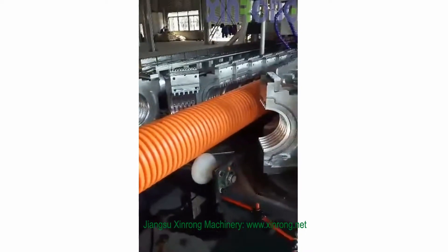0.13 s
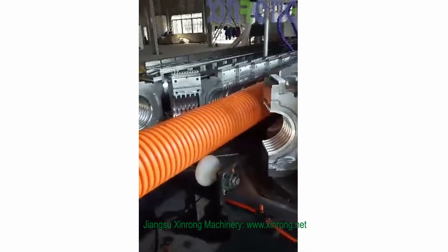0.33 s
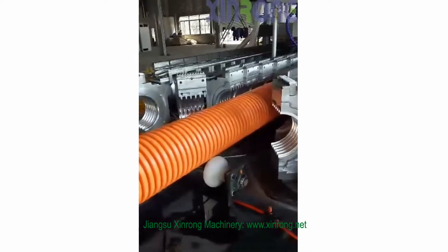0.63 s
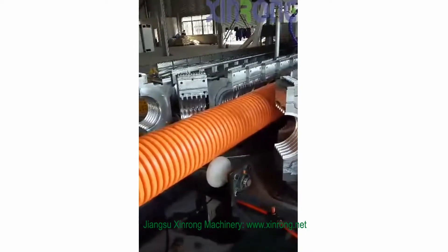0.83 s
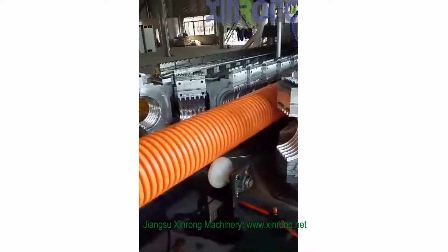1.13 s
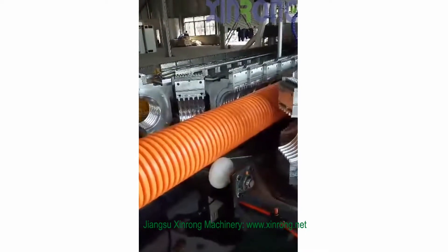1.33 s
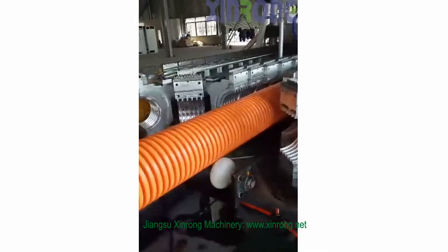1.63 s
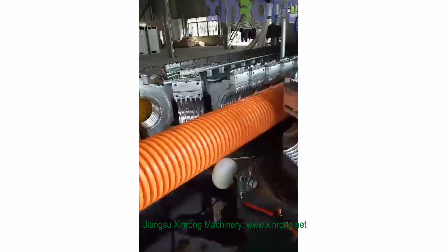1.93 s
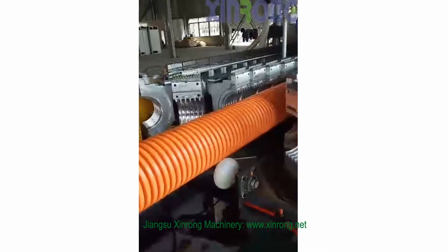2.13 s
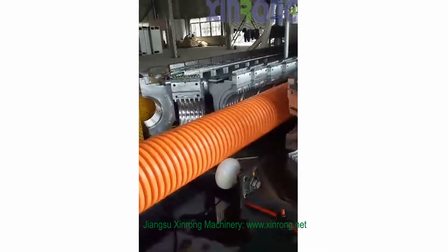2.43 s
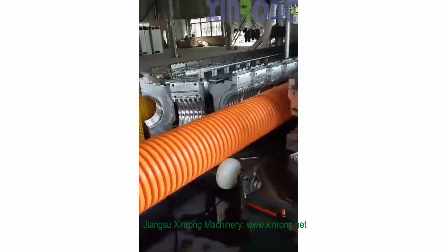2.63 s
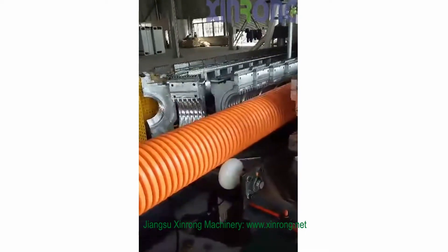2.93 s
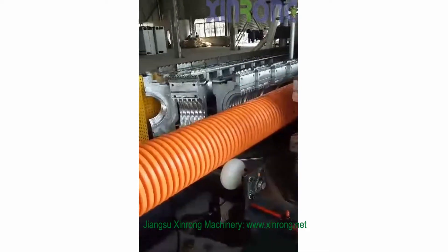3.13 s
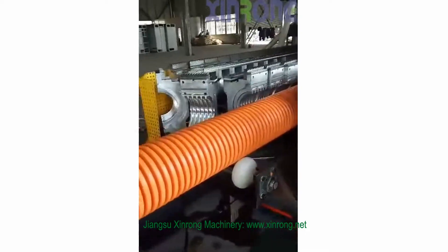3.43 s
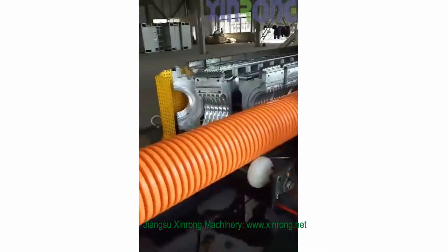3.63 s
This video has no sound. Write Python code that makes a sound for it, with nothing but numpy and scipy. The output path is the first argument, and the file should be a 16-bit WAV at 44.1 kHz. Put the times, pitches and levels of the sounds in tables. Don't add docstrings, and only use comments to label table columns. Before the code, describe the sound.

Pipe-making machinery drones steadily in a factory hall, with a low blower hum and airy hiss

```python
import sys
import numpy as np
from scipy import signal
from scipy.fft import rfft, irfft
from scipy.io import wavfile
from scipy.ndimage import uniform_filter1d

SR = 44100
rng = np.random.default_rng(int(sys.argv[2]) if len(sys.argv) > 2 else 0)


def waveform_to_disk(signal):
    frames = np.transpose(np.atleast_2d(signal))
    scaled = np.clip(frames, -1, 1) * 32767
    samples = np.round(scaled).astype(np.int16)
    wavfile.write(sys.argv[1], SR, samples)


def voltage_ratio(decibels):
    exponent = np.asarray(decibels, float) / 20
    return 10 ** exponent


N = 167580

STALL_TIMES = [1.2200, 3.2043]


def level(x, db):
    return x * voltage_ratio(db) / np.sqrt(np.mean(x ** 2))


def walk(rate):
    hold = int(SR / rate)
    steps = np.repeat(rng.standard_normal(N // 400), hold)[:N]
    return 1.26 * uniform_filter1d(uniform_filter1d(steps, hold), hold)


def read(table, at):
    return np.interp(at, *np.array(table, float).T)


def colour(x, table):
    hz, db = np.array(table).T
    log_hz = np.log(np.arange(N // 2 + 1) * SR / N + 1)
    return irfft(rfft(x) * voltage_ratio(np.interp(log_hz, np.log(hz), db)), N)


def ring(x, hz, width_hz):
    return signal.lfilter(*signal.iirpeak(hz, hz / width_hz, fs=SR), x)


def tone(hz, db, sway_db=1.5):
    drifting_hz = hz * (1 + .0001 * walk(1.492))
    phase = 2 * np.pi * (np.cumsum(drifting_hz) / SR + rng.random())
    return np.sqrt(2) * voltage_ratio(db + sway_db * walk(3.74)) * np.sin(phase)


def slip(t):
    skip_times = [.25, 2.232]
    packet_s = 1024 / 48000
    return packet_s * (sum(t >= s for s in skip_times) - sum(t >= s for s in STALL_TIMES))


def blower(t):
    # [multiple, level/dB]
    harmonics = [(1, 0.5), (2, -20), (5, -24)]
    # [t/s, level/dB]
    facing = [(0, -24), (.15, -30.5), (.27, -25), (.45, -29), (1.1, -29.5), (1.35, -29.5), (1.5, -28.5),
              (2.1, -30), (2.25, -28.5), (2.5, -29), (2.8, -29), (3.05, -27), (3.4, -26), (3.58, -26.5),
              (3.7, -25.5), (3.8, -26)]
    blade_hz = 245.86
    song = sum(tone(k * blade_hz, db, sway_db=.4) for k, db in harmonics)
    return voltage_ratio(read(facing, t)) * song


def drives():
    # [multiple, level/dB]
    harmonics = [(1, -37.5), (2, -41), (3, -42.5), (8, -52.5)]
    ripple_hz = 300.1
    return sum(tone(k * ripple_hz, db) for k, db in harmonics)


def gears():
    mesh_hz = [75.5, 100.3, 621.2, 783.2, 929.1, 1368.2, 2555.0, 3019.6]
    mesh_db = [-46, -48, -43, -41.5, -45, -41, -50.5, -53.5]
    return sum(tone(hz, db) for hz, db in zip(mesh_hz, mesh_db))


def clunks(t):
    # [t/s, level/dB]
    closings = [
        (3.328, -23),
    ]
    # [f/Hz, level/dB, t60/s]
    modes = [(488, 0, .3), (532, 0, .25), (395, -8, .3), (960, -14, .1)]
    out = np.zeros(N)
    for at, db in closings:
        s = np.maximum(t - at - slip(at), 0)
        push = 1 - np.exp(-s / .006)
        for hz, mode_db, t60 in modes:
            decay = voltage_ratio(-60 * s / t60)
            out += voltage_ratio(db + mode_db) * push * decay * np.sin(2 * np.pi * hz * s)
    return out


def turbulence(shape, db, flicker_db, shared_db):
    spectrum = rfft(colour(rng.standard_normal(N), shape))
    place = 2 * np.log2(np.arange(N // 2 + 1) * SR / N / 25 + 1e-9)
    out = 0
    for k in range(18):
        overlap = np.cos(np.pi / 2 * np.clip(place - k, -1, 1)) ** 2
        band = irfft(spectrum * overlap, N)
        out = out + band * voltage_ratio(flicker_db * walk(9) + shared_db)
    return level(out, db)


def cooling_air(shared_db):
    # [f/Hz, density/dB]
    jets = [(880, -19), (1500, -3.5), (2040, 0), (2490, -2.5), (3600, -7), (6360, -9), (7900, -23.5),
            (9130, -27), (10200, -31.5), (13300, -75.5), (22000, -120)]
    return turbulence([(1000, -42)] + jets + [(11500, -79)], -33, 0.46, shared_db)


def ducts():
    # [f/Hz, width/Hz, level/dB]
    resonances = [(169.2, 14, -46.5), (194.9, 16, -49), (383.8, 31, -39), (455, 16, -45), (529.5, 29, -50),
                  (704.7, 30, -51.5), (1239, 24, -48.5), (2270, 1250, -40.5)]
    out = 0
    for hz, width_hz, db in resonances:
        rung = ring(ring(rng.standard_normal(N), hz, width_hz), hz, width_hz)
        out = out + level(rung, db) * voltage_ratio(1.18 * walk(3.28))
    return out


def hall_roar(shared_db):
    # [f/Hz, density/dB]
    rumble = [(22, -23), (45, -32), (62, -24), (72, -11.5), (194, -4), (338, -7), (1270, -16.5),
              (1950, -35.5)]
    return turbulence([(10, -40)] + rumble + [(2200, -51.5)], -27.5, 0.41, shared_db)


def scene():
    # [t/s, level/dB]
    load = [(0, -0.5), (.7, -.5), (1.6, 0.5), (2.6, 0), (3.2, 1), (3.8, 1.5)]
    # [f/Hz, level/dB]
    width = [(40, -15), (110, -32), (250, -37), (580, -32.5), (1020, -24), (1790, -21), (5550, -19),
             (9770, -7.5)]
    t = np.arange(N) / SR
    shared_db = .4 * walk(8)
    roar = hall_roar(shared_db) + ducts()
    air = cooling_air(shared_db)
    machines = blower(t) + drives() + gears() + clunks(t)
    mid = machines + roar * voltage_ratio(read(load, t)) + air

    spectrum = rfft(roar + air)
    scrambled = np.exp(2j * np.pi * rng.random(len(spectrum)))
    diffuse = irfft(np.abs(spectrum) * scrambled, N)
    side = colour(diffuse, width) * voltage_ratio(1.5 * walk(12))
    right = colour(mid - side, [(700, 0), (8000, 1)])
    return np.array([mid + side, right])


def thin_spectrum(x):
    # [f/Hz, step/dB]
    mid_step = [(100, -14), (5500, -14), (7000, -6), (7600, 5), (8400, 9.5), (9300, 9), (9700, 13),
                (10500, 13.5)]
    # [f/Hz, step/dB]
    side_step = [(100, 11), (300, 14), (600, 11), (1150, 8), (1450, -1), (6000, 0), (7500, 4),
                 (10500, 13.5)]
    scatter_db = [
        [.6],
        [5],
    ]
    frame, grid, lines_kept = 1024, 600, 490
    n, k = np.arange(2 * frame), np.arange(lines_kept)
    window = np.sin(np.pi * (n + .5) / (2 * frame))
    cosines = np.cos(np.pi / frame * np.outer(n + .5 + frame / 2, k + .5))
    basis = np.sqrt(2 / frame) * window[:, None] * cosines

    front, frames = 2 * frame - grid, N // frame + 3
    pair = np.array([x[0] + x[1], x[0] - x[1]]) / 2
    pair = np.pad(pair, ((0, 0), (front, 3 * frame)), mode="reflect")
    at = frame * np.arange(frames)[:, None] + n
    lines = np.array([p[at] @ basis for p in pair])

    size = np.sqrt(uniform_filter1d(np.median(lines ** 2, axis=1) / .455, size=16))
    hz = (k + .5) * SR / 2 / frame
    step = size * voltage_ratio(np.array([read(mid_step, hz), read(side_step, hz)])) + 1e-9
    budget = np.sqrt(3) * uniform_filter1d(rng.standard_normal((2, frames)), size=3)
    step = step[:, None] * voltage_ratio(scatter_db * budget)[:, :, None]
    lines = np.sign(lines) * np.floor(np.abs(lines) / step + .4) * step

    blocks = np.array([p @ basis.T for p in lines]).reshape(2, frames, 2, frame)
    joined = (blocks[:, 1:, 0] + blocks[:, :-1, 1]).reshape(2, -1)
    mid, side = joined[:, front - frame:front - frame + N]
    return np.array([mid + side, mid - side])


def roll_off(x):
    return signal.sosfilt(signal.butter(12, 10370, fs=SR, output="sos"), x)


def record(dry):
    # [f/Hz, density/dB]
    stall_hiss = [(100, -10), (3000, 4), (7000, 0), (9300, 2.5), (9800, -53.5)]
    stall_s = .0133
    t = np.arange(N) / SR
    on = np.prod([(t < s) | (t >= s + stall_s) for s in STALL_TIMES], axis=0)
    hiss = level(colour(rng.standard_normal(N), stall_hiss), -53)
    heard = dry[:, np.round((t + slip(t)) * SR).astype(int)]
    mix = thin_spectrum(heard * on + hiss * (1 - on))
    return roll_off(mix)


dry = scene()
out = record(dry)
waveform_to_disk(out)
```